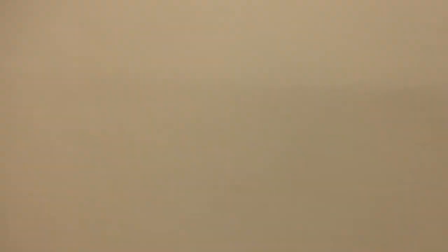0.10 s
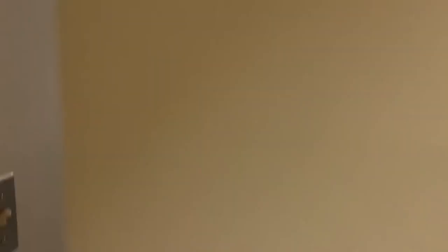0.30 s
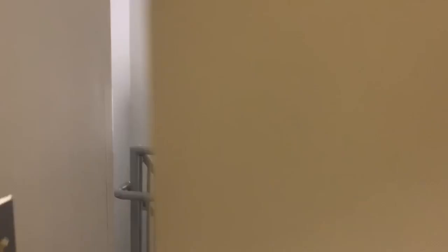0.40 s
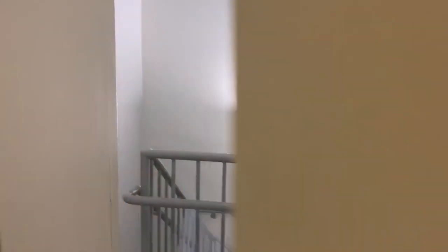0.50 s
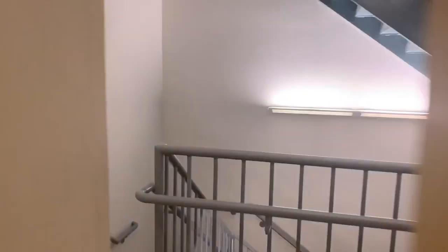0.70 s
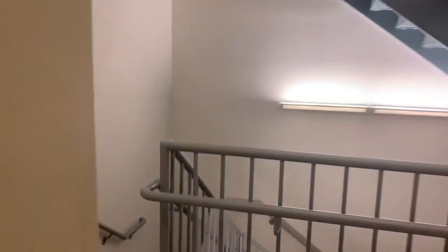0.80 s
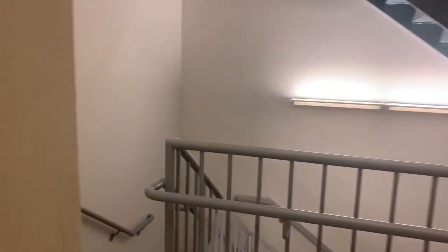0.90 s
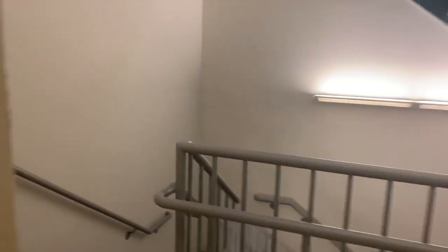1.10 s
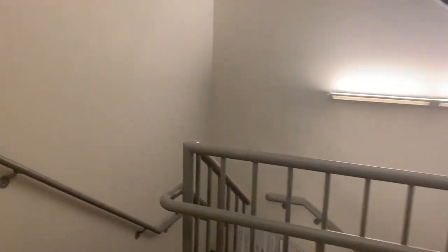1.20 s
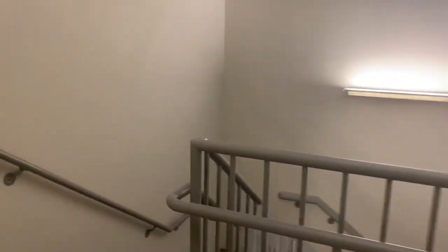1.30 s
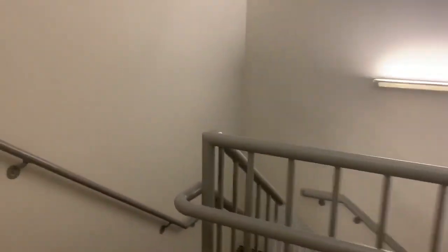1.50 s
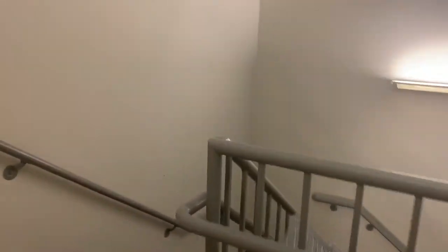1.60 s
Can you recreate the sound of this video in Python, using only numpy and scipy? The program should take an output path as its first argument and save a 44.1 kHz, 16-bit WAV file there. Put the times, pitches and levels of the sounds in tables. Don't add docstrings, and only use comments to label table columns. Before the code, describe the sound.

A heavy stairwell door swings open with low air puffs and thin creaks, then its push bar clacks

```python
import sys
import numpy as np
from scipy import signal
from scipy.fft import rfft, irfft
from scipy.io import wavfile
from scipy.ndimage import uniform_filter1d

SR = 44100
rng = np.random.default_rng(int(sys.argv[2]) if len(sys.argv) > 2 else 0)


def how_loud(loudness_db):
    steps = np.asarray(loudness_db, float) / 20
    return 10 ** steps


def dump(signal):
    limited = np.clip(np.atleast_2d(signal).T, -1, 1)
    pcm = np.round(limited * 32767).astype(np.int16)
    wavfile.write(sys.argv[1], SR, pcm)


N = 72765
T = np.arange(N) / SR
DOOR_OPEN_S = 0.22

# t/s, level/dB, contact time/ms
BLOWS = [
    (1.1166, -13.5, 0.033),
    (1.122, -10, 0.087),
    (1.1252, -32, 0.41),
    (1.1279, -13, 0.19),
    (1.1400, -62, 0.33),
    (1.147, -14, 1),
]


def unit(x):
    return x / np.sqrt(np.mean(x ** 2))


def colour(x, points):
    p, f = np.array(points), np.fft.rfftfreq(N, 1 / SR) + 1
    gain = how_loud(np.interp(np.log(f), np.log(p[:, 0]), p[:, 1]))
    return irfft(rfft(x) * gain, N)


def band(x, hz, width_hz):
    return signal.lfilter(*signal.iirpeak(min(hz, .45 * SR), hz / width_hz, fs=SR), x)


def fade(start, db, t60, attack_s=0.0026):
    t = np.maximum(T - start, 0)
    return how_loud(db - 60 * t / t60) * (1 - np.exp(-t / attack_s))


def walk(rate):
    k = int(SR / rate)
    return unit(uniform_filter1d(uniform_filter1d(rng.standard_normal(N), k), k))


def ports(x, twin):
    # f/Hz, share/1
    unlike = [(30, 0), (200, 0.67), (700, 1), (2000, 1), (5500, 1), (7200, 0.19), (16000, 0.3)]
    lag_s, null_hz = .000208, 8700
    f = np.fft.rfftfreq(N, 1 / SR) + 1
    turns = f * lag_s - (null_hz * lag_s - 3 / 2) * f ** 2 / (f ** 2 + 1200 ** 2)
    hz, share = np.array(unlike).T
    own = np.clip(np.interp(np.log(f), np.log(hz), share), 0, 1)
    common = rfft(x) * np.exp(-2j * np.pi * turns) * np.sqrt(1 - own)
    left = irfft(common + rfft(twin) * np.sqrt(own), N)
    return np.array([left, x])


def air():
    # f/Hz, level/dB
    rush_spectrum = [(15, -63.5), (25, -10), (124, -5.5), (226, -17), (273, -13.5), (378, -33), (410, -25),
                     (1730, -38), (16500, -67)]
    rush_db, hum_db, hum_hz, duct_db, duct_hz = -35, -44.5, 120.5, -41.5, 267.6
    rush = []
    for _ in range(2):
        noise = unit(colour(rng.standard_normal(N), rush_spectrum))
        rush.append(noise * how_loud(rush_db - 5.5 + 0.38 * walk(5.3)))
    hum = how_loud(hum_db - 9.1 * T + 0.94 * walk(34)) * np.sin(2 * np.pi * hum_hz * T) * 2 ** .5
    duct_size = how_loud(duct_db - .5 * ((T - DOOR_OPEN_S / 2) / 0.014) ** 2)
    duct = duct_size * np.sin(2 * np.pi * duct_hz * T)
    return ports(rush[0] + hum + duct, rush[1] + hum + duct)


def draught():
    corridor_db, corridor_hz, swish_db, swish_s, swish_half_s = -55, 394, -64.5, 0.57, 0.13
    corridor_size = how_loud(corridor_db - 15 * np.clip(T - DOOR_OPEN_S, 0, 1) / 1.06)
    corridor = corridor_size * unit(band(rng.standard_normal(N), corridor_hz, 190))
    swish = how_loud(swish_db + 2 * walk(25)) * np.exp(-.5 * ((T - swish_s) / swish_half_s) ** 2)
    return corridor + swish * unit(band(rng.standard_normal(N), 3100, 6000))


def hinge():
    # t/s, f/Hz, level/dB
    high = [(.03, 987, -61.5), (.13, 977, -66), (.2, 983, -52.5), (.24, 993.6, -43.5), (.298, 995.4, -48.5),
            (.404, 985.4, -45), (.422, 988.4, -59), (.44, 983.7, -44.5), (.468, 986, -59),
            (.492, 980.4, -48.5), (.52, 986, -55), (.55, 988, -69)]
    low = [(.364, 845, -75.5), (.378, 841.6, -55), (.45, 844, -54), (.476, 844, -45.5), (.512, 845, -47.5),
           (.546, 832, -64), (.598, 826, -49), (.614, 828, -53), (.74, 823.6, -53), (.788, 820, -45.5),
           (.835, 824, -71)]
    third = [
        (0.19, 706, -69.5),
        (0.25, 717.7, -49),
        (0.332, 726, -49.5),
        (0.35, 724.6, -60.5),
        (0.42, 719.5, -51.5),
    ]
    top = [
        (.37, 1807, -80.5),
        (.42, 1820, -61),
        (.6, 1787, -75.5),
        (.78, 1810, -77),
        (.86, 1790, -86),
    ]
    overtone_db, high_octave_db = -18.5, -23.5
    out = 0
    for note in (high, low, third, top):
        s, hz, db = np.array(note).T
        turn = 2 * np.pi * np.cumsum(np.interp(T, s, hz) * (1 + .0015 * walk(40))) / SR
        size = how_loud(np.interp(T, s, db, -120, -120) + .9 * walk(35)) * 2 ** .5
        wave = np.sin(turn)
        if note is low:
            wave = wave + how_loud(overtone_db) * (np.sin(2 * turn) + .5 * np.sin(3 * turn))
        if note is high:
            wave = wave + how_loud(high_octave_db) * np.sin(2 * turn)
        out = out + size * wave
    return out


def ticks():
    # t/s, level/dB, f/Hz, T60/s
    tick_table = [(0.213, -57.5, 11500, 0.099), (0.14, -54.5, 3900, .04), (0.23, -53.5, 1873, .15),
                  (.285, -52, 2200, .1), (.369, -56, 3800, .05), (.407, -50, 1600, 0.12),
                  (.408, -54, 4100, .08), (0.423, -48.5, 3240, 0.07), (0.43, -50, 1900, .06),
                  (.424, -53, 5300, .05), (.424, -58.5, 7000, 0.035), (.55, -58, 3000, .2),
                  (0.86, -45, 400, .05), (.722, -42, 480, .05), (0.64, -56, 2100, 0.062),
                  (.805, -46, 400, 0.049), (.76, -39, 480, 0.071), (0.945, -50, 1100, 0.2),
                  (.946, -50, 2200, .2), (0.64, -54, 4300, .2), (1.142, -37, 380, .55),
                  (1.211, -34.5, 182, 0.3), (1.367, -40.5, 870, 0.17), (1.364, -32, 1860, 0.078),
                  (1.38, -45, 380, .15), (1.1, -41, 1400, 0.06), (1.365, -50, 4940, .05),
                  (1.3, -64, 6400, 0.057), (1.424, -40.5, 370, 0.071), (1.467, -49, 561.6, 0.027),
                  (1.591, -37.5, 581, 0.038)]
    out = 0
    for s, db, hz, t60 in tick_table:
        width_hz = 0.39 * hz
        ring = band(band(rng.standard_normal(N), hz, width_hz), hz, width_hz)
        out = out + fade(s, db, t60) * unit(ring)
    return out


def puffs():
    puff_table = [(.225, 91, 15.3, -20), (0.2414, 169, 5.1, -15.5), (0.2526, 124.6, 3.9, -9.5),
                  (.2525, 380, 2.16, -20.5), (.26, 260, 4.4, -20.5), (0.2886, 97.7, 9.8, -14.5),
                  (.3, 172, 6, -17), (.297, 330, 5, -24), (0.3258, 84, 12.4, -14), (.334, 374, 2.1, -20),
                  (0.351, 56.6, 22, -23.5), (0.39, 94.4, 4.8, -27.5), (.42, 100.7, 7.9, -28),
                  (.567, 124.6, 6.96, -9.5), (.58, 72.5, 9, -17), (.626, 125.3, 19, -28.5),
                  (.659, 96.6, 10.6, -26), (0.6942, 69.7, 10.5, -17), (.723, 140, 4.8, -22.5),
                  (0.7375, 57, 11, -17.5), (.7743, 115, 10.7, -24.5), (0.797, 59.9, 17, -27),
                  (0.8384, 90, 7.9, -30.5), (.8695, 147.5, 3.9, -24), (0.8861, 172, 3.4, -25.5),
                  (.8959, 60.6, 16.5, -27), (0.9745, 58.7, 21, -31.5), (1.065, 54.2, 19, -39),
                  (1.2973, 61, 7.3, -35), (1.3607, 88, 8.2, -23), (1.3509, 153, 4.2, -26),
                  (1.5124, 72.3, 6.6, -34.5)]
    flutter_db, flutter_hz, side_db = -17, 330, -10.5
    out, size = np.zeros((2, N)), np.zeros(N)
    leans = rng.uniform(0, 2 * np.pi, len(puff_table))
    for (s, hz, ms, db), lean in zip(puff_table, leans):
        bell = how_loud(db) * np.exp(-.5 * ((T - s) * 1000 / ms) ** 2)
        out -= bell * np.cos(2 * np.pi * hz * (T - s) - np.array([[0], [lean]]))
        edge_db = db + .15 * (min(db, -15) + 14) - max(db + 15, 0)
        size += how_loud(edge_db) * np.exp(-.5 * ((T - s) * 1000 / (ms + 6)) ** 2)
    flutter_band = signal.butter(3, (140, flutter_hz), "band", fs=SR, output="sos")
    edge = np.array([unit(signal.sosfilt(flutter_band, rng.standard_normal(N))) for _ in range(2)])
    mid, side = out + how_loud(flutter_db) * size * edge
    return mid + how_loud(side_db) * side * np.array([[1], [-1]])


def squeals():
    # t/s, length/s, f/Hz, level/dB
    squeal_table = [(0.98, 0.034, 7400, -40.5), (0.98, .02, 9800, -36), (.99, 0.013, 12300, -41),
                    (1.0, 0.017, 14800, -47), (0.99, 0.016, 2880, -37.5), (0.987, 0.031, 3660, -42.5),
                    (.986, 0.024, 1990, -42), (1.005, 0.018, 10500, -44.5), (1.03, 0.0124, 7700, -40),
                    (1.038, 0.014, 4260, -37.5), (1.042, 0.0087, 10600, -40.5), (1.043, 0.0087, 11000, -44),
                    (1.042, 0.009, 14600, -41), (1.045, 0.0093, 2700, -41.5), (1.077, 0.025, 9700, -47),
                    (1.08, 0.028, 2580, -45), (1.08, 0.029, 6400, -51), (1.03, 0.048, 955, -39),
                    (1.116, 0.007, 15600, -38), (1.122, 0.0059, 12100, -32.5), (1.365, 0.017, 980, -37.5),
                    (.98, .01, 14800, -41.5), (1.278, .04, 3410, -51.5), (1.1, .03, 6080, -52),
                    (.368, .012, 2300, -50.5), (1.122, 0.0065, 7800, -32.5), (1.122, 0.0073, 9700, -33.5)]
    width, edge_s = 0.1, 0.0027
    out = 0
    for s, hold, hz, db in squeal_table:
        rise = np.clip((T - s) / edge_s, 0, 1)
        fall = np.exp(-np.maximum(T - s - hold, 0) / edge_s / 2)
        ring = band(band(rng.standard_normal(N), hz, width * hz), hz, 2 * width * hz)
        out = out + how_loud(db) * rise * fall * unit(ring)
    return out


def scrape():
    # t/s, level/dB, T60/s
    jolts = [
        (0.979, -31.5, 0.57),
        (0.988, -28, 0.31),
        (1.010, -37.5, .3),
        (1.031, -36, .2),
        (1.04, -27.5, 0.11),
        (1.076, -31, 0.39),
        (1.111, -32, .3),
    ]
    # f/Hz, level per Hz/dB
    scrape_spectrum = [(240, -21), (380, -12), (638, -3.5), (1750, -7), (4190, -11), (8580, -10.5),
                       (11400, -7.5), (15500, -7), (16500, -32.5)]
    tube_hz, tube_width_hz, tube_db, patchy_db = 710, 170, -3, 0.5
    grit = rng.standard_normal(N) * how_loud(2.96 * rng.exponential(size=N))
    tube = band(band(grit, tube_hz, tube_width_hz), tube_hz, 450)
    slide = np.max([fade(s, db, t60) for s, db, t60 in jolts], axis=0)
    slide = slide * np.clip((BLOWS[1][0] - T) / 0.004, 0, 1)
    patches = 0
    for hz in 700 * 1.3 ** np.arange(8):
        patches = patches + how_loud(patchy_db * walk(61)) * (2000 / hz) ** .5 * band(grit, hz, .5 * hz)
    return slide * (unit(colour(patches, scrape_spectrum)) + how_loud(tube_db) * unit(tube))


def clack():
    # f/Hz, level/dB, T60/s
    bar = [(955, -38.5, 0.14), (1215, -20.5, 0.052), (1460, -26, 0.06), (1775, -25, 0.06),
           (2840, -23, 0.06), (3350, -18, 0.045), (3570, -21, .045), (3950, -22, .045), (4430, -22, 0.06)]
    # f/Hz, level per Hz/dB
    rattle_spectrum = [(71, -60), (120, -1.5), (637, -6.5), (904, -8.5), (1210, -7.5), (2150, -13.5),
                       (3450, -9), (12100, -24), (16500, -31.5)]
    rattle_db, rattle_t60_s, ring_share, ring_rough = -10, 0.074, .45, .8
    out = np.zeros(N)
    mixes = rng.standard_normal((len(bar), len(BLOWS)))
    for (hz, mode_db, t60), mix in zip(bar, mixes):
        ring = 0
        for (s, db, ms), m in zip(BLOWS, mix):
            t = np.maximum(T - s, 0)
            soft = 1 / (1 + (hz * ms / 1000) ** 2)
            decay_db = 60 * t / t60 / ring_share * hz / 4000
            size = soft * how_loud(db + mode_db + 0.73 * m - decay_db)
            ring = ring + size * np.sin(2 * np.pi * hz * (1 + 0.015 * m) * t)
        out += ring * (1 + ring_rough * walk(30 + 0.063 * hz))
    rattle = unit(colour(rng.standard_normal(N), rattle_spectrum))
    for s, db, ms in BLOWS:
        softened = signal.lfilter(*signal.butter(1, min(1000 / ms, .45 * SR), fs=SR), rattle)
        out += softened * fade(s, db + rattle_db, rattle_t60_s, 0.00025)
    return out


def leaf(turn=0):
    # f/Hz, level/dB, T60/s, late start/s
    modes = [(176.5, -24.5, 0.41, 0.0096), (246, -20, 0.082, 0.0036), (472, -20, 0.041, 0.00078),
             (525.8, -12.5, 0.1, .001), (572, -19, 0.058, .001), (618, -11, 0.07, .001),
             (681, -12.5, .06, 0.00063)]
    start_s, rise_s = 1.1215, 0.0033
    out = 0
    for hz, db, t60, late in modes:
        size = fade(start_s + late, db, t60, rise_s) * (1 + 0.39 * walk(50))
        out = out + size * np.cos(2 * np.pi * (hz * (T - BLOWS[3][0]) - turn))
    return out


def stairwell(x):
    t60_s, treble_t60_s, corner_hz, echo_db = 0.66, .2, 6000, -11.5
    low = signal.butter(2, corner_hz, fs=SR)
    tails = []
    for noise in rng.standard_normal((2, N)):
        bass = signal.lfilter(*low, noise)
        tail = bass * fade(0.0024, 0, t60_s, 0.0026)
        tail = tail + (noise - bass) * fade(0.0063, 0, treble_t60_s, 0.0092)
        tails.append(signal.fftconvolve(x, tail / np.sqrt(np.sum(tail ** 2)))[:N])
    return how_loud(echo_db) * ports(*tails)


def scene():
    leaf_echo_db, left_leaf_db, left_leaf_turn = -5, -2.5, .07
    door, twin = (scrape() + squeals() + clack() + ticks() + draught() for _ in range(2))
    sing, boom = hinge(), leaf()
    left_boom = how_loud(left_leaf_db) * leaf(left_leaf_turn)
    direct = ports(door + sing + boom, twin + sing + left_boom)
    echo = stairwell(door + how_loud(leaf_echo_db) * boom + 1.18 * sing)
    return direct + echo + puffs() + air()


def roll_off(x):
    return signal.sosfilt(signal.butter(12, 16810, fs=SR, output="sos"), x)


def record(dry):
    dry = signal.sosfilt(signal.butter(2, 38, "high", fs=SR, output="sos"), dry)
    dry = signal.sosfilt(signal.ellip(8, .2, 40, 15850, fs=SR, output="sos"), dry)
    return roll_off(dry)


dry = scene()
out = record(dry)
dump(out)
```